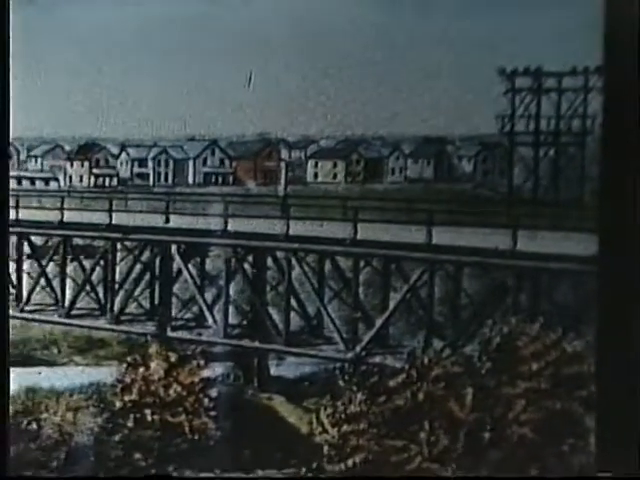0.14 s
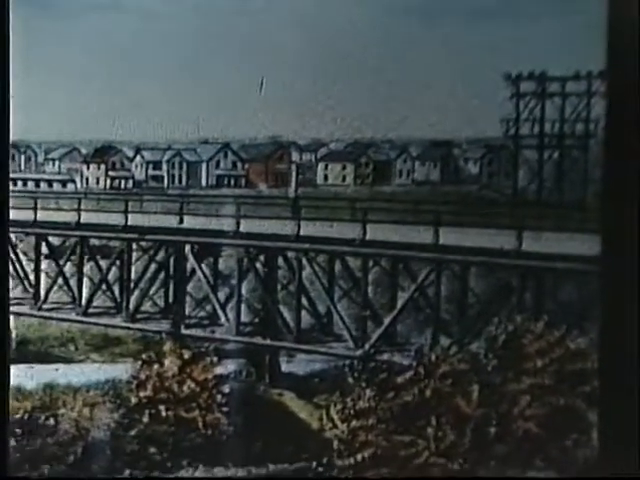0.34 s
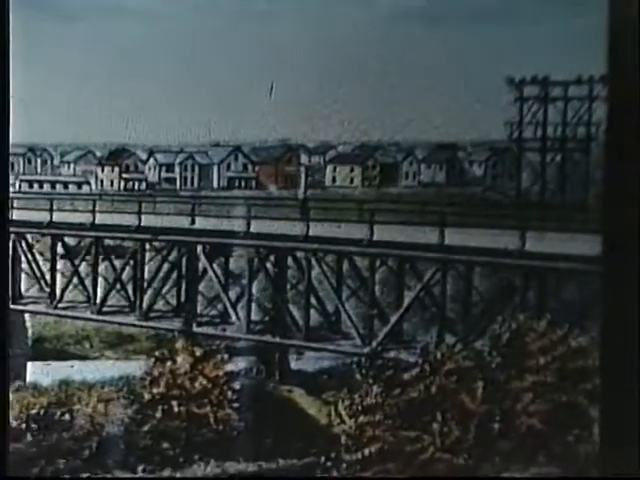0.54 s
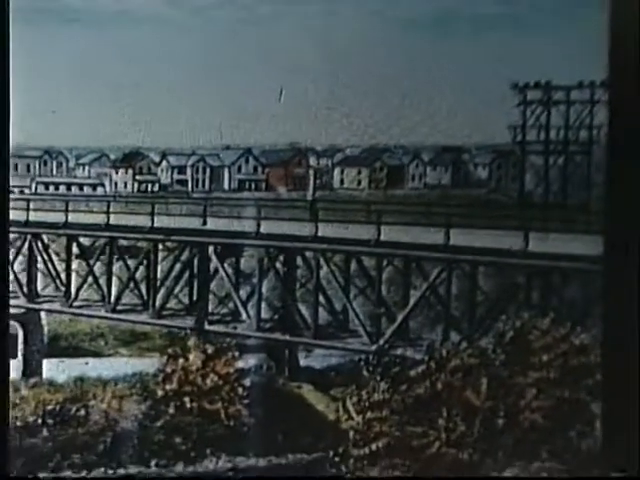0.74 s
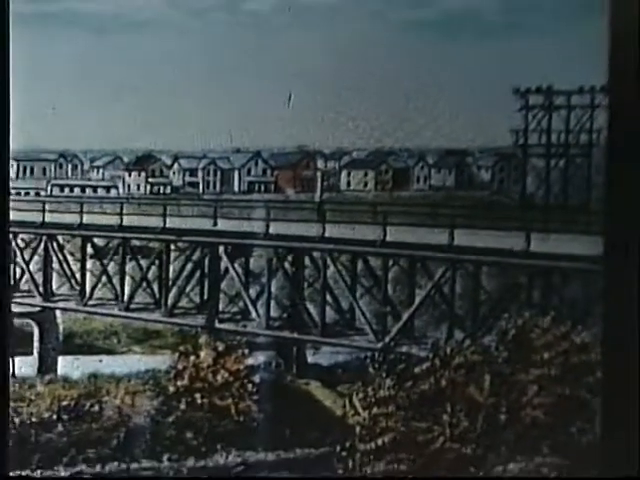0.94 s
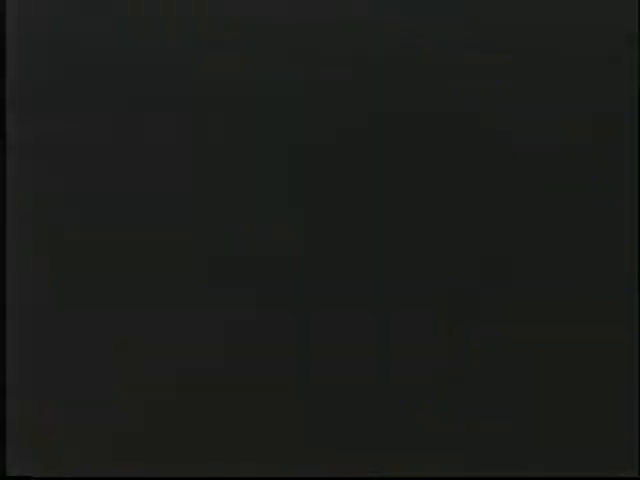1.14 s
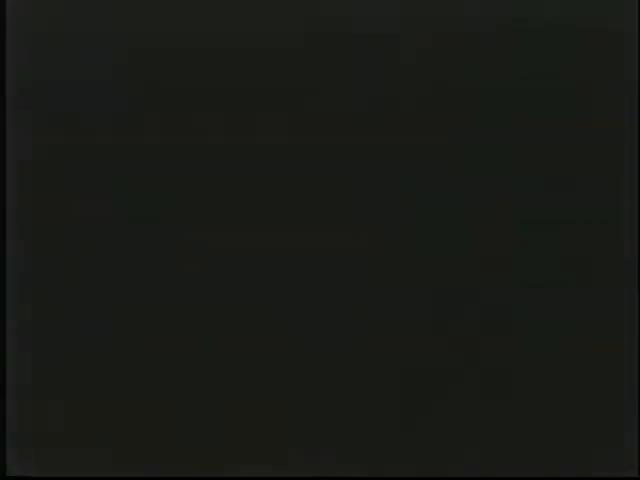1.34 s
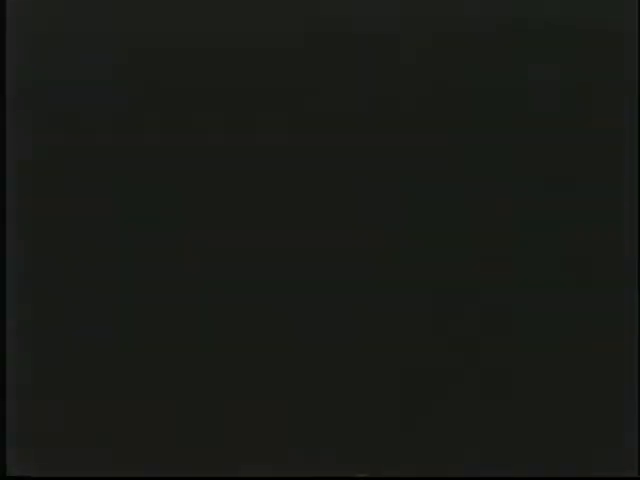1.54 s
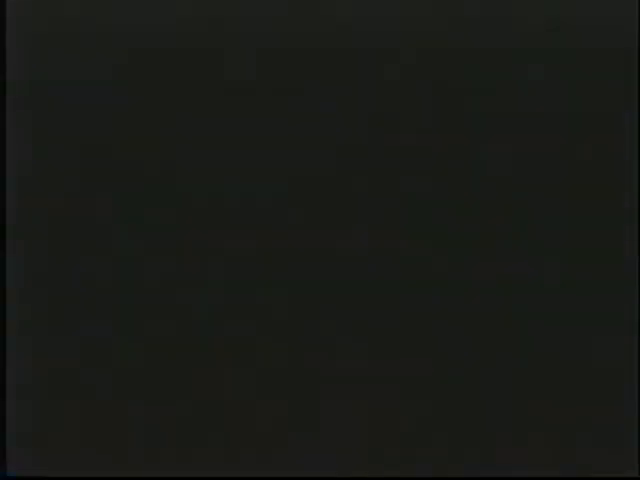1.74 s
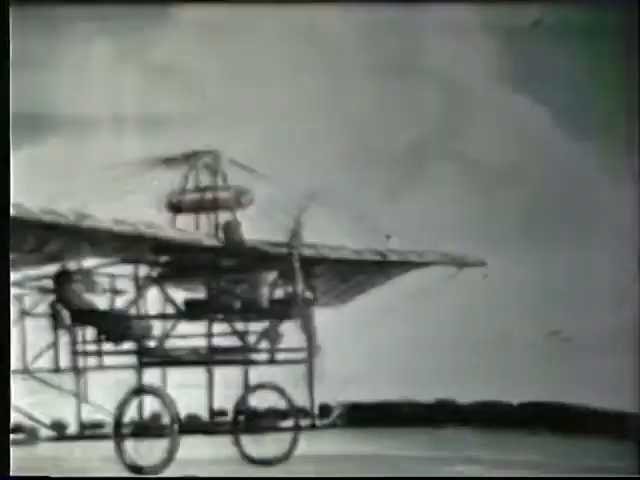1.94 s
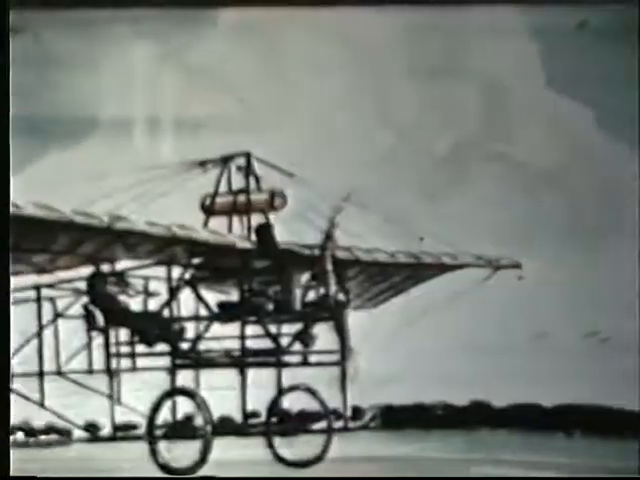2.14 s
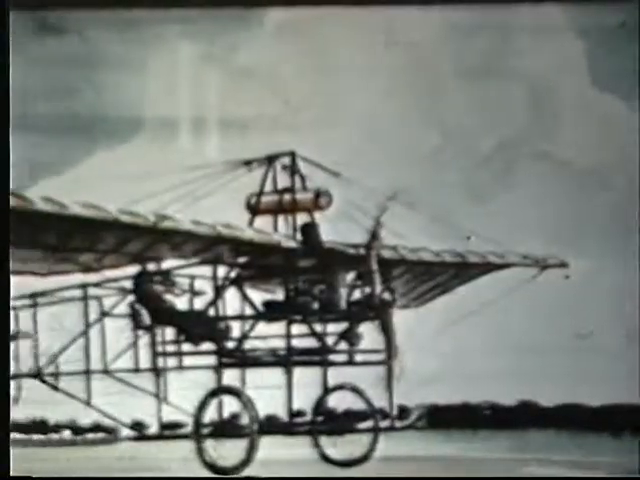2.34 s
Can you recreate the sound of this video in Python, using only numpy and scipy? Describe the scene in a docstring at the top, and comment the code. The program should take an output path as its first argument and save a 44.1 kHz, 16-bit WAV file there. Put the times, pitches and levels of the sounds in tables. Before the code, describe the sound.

A slide projector changes slides with scrape, groan and one sharp clack over fan hum and hiss

```python
"""A slide projector changes slides a few metres away in a small room, over its fan, mains hum and tape hiss.
The arm scrapes the old slide out (random slips) while the housing groans (a noise-blurred gliding tone),
the tray steps on with one clack (noise bursts by octave over ringing modes), the next slide rattles in
amid linkage ticks and seats with a soft knock (resonant noise). The fan is coloured noise under sines."""
import sys
import numpy as np
from scipy import signal
from scipy.fft import rfft, irfft, next_fast_len
from scipy.io import wavfile
from scipy.ndimage import uniform_filter1d

SR = 44100
rng = np.random.default_rng(int(sys.argv[2]) if len(sys.argv) > 2 else 0)


def persist_wave(psi):
    """Save psi, clipped to +-1, as 16-bit WAV."""
    counts = np.round(np.clip(psi, -1, 1) * 32767).astype(np.int16)
    wavfile.write(sys.argv[1], SR, np.atleast_2d(counts).T)


N = 110161
T = np.arange(N) / SR


def undb(db):
    """Decibels to gain."""
    return 10 ** (np.asarray(db) / 20)


def unit(x):
    """Scale to rms 1."""
    return x / np.sqrt(np.mean(x ** 2) + 1e-30)


def noise():
    """White noise."""
    return rng.standard_normal(N)


def on_log(hz, points):
    """Read (f/Hz, value) points on a log-frequency axis."""
    f, value = np.array(points, float).T
    return np.interp(np.log(np.maximum(hz, 1)), np.log(f), value)


def shaped(x, gain):
    """Filter by a gain that is a function of frequency; rms 1."""
    size = next_fast_len(N, True)
    hz = np.arange(size // 2 + 1) * SR / size + 1e-3
    return unit(irfft(rfft(x, size) * gain(hz), size)[:N])


def coloured(x, points, tilt_db=0):
    """Give a sound a spectrum, tilted in dB per octave; rms 1."""
    def gain(f):
        tilt = tilt_db * np.log2(np.maximum(f, points[0][0]))
        return undb(on_log(f, points) + tilt)
    return shaped(x, gain)


def resonant(x, peaks):
    """Pass a sound through steep-sided resonances (f/Hz, width/Hz, level/dB); rms 1."""
    def gain(f):
        total = 0
        for hz, width, db in peaks:
            detuning = (f * f - hz * hz) / (f * width)
            total = total + undb(db) / (1 + detuning ** 2 * 2)
        return total
    return shaped(x, gain)


def wobbling(hz, width, rough):
    """A resonance that speaks as a tone blurred by noise of the given bandwidth; rms 1."""
    def blur():
        return shaped(noise(), lambda f: 1 / (1 + (2 * f / width) ** 4))
    phase = 2 * np.pi * (np.cumsum(hz * np.ones(N)) / SR + rng.random())
    return unit((1 + rough * blur()) * np.sin(phase) + rough * blur() * np.cos(phase))


def fall(age, t60):
    """Exponential fall by 60 dB in t60 seconds."""
    return np.exp(-np.log(1000) * age / max(t60, 1e-3))


def strike(start, rise, t60):
    """Envelope of a blow: quick rise, exponential fall."""
    age = np.maximum(T - start, 0)
    return (1 - np.exp(-age / max(rise, 1e-4))) * fall(age, t60)


def ring(start, rise, modes):
    """Modes (f/Hz, level/dB, t60/s) set ringing by one blow, for half a second at most."""
    out, first = np.zeros(N), int(start * SR)
    age = T[:min(SR // 2, N - first)]
    tone, power = np.zeros(len(age)), 0
    for hz, db, t60 in modes:
        tone += undb(db) * np.sin(2 * np.pi * (hz * age + rng.random())) * fall(age, t60)
        power += undb(db) ** 2 / 2
    out[first:first + len(age)] = tone * (1 - np.exp(-age / max(rise, 1e-4)))
    return out / np.sqrt(power)


def walk(rate):
    """Smooth random drift of rms 1, with `rate` new values per second."""
    k = int(SR / rate)
    steps = np.repeat(rng.standard_normal(N // k + 1), k)
    return unit(uniform_filter1d(uniform_filter1d(steps, k), k)[:N])


def follow(curve):
    """Gain along a (t/s, level/dB) curve, silent outside it."""
    s, db = np.array(curve, float).T
    return undb(np.interp(T, s, db, left=-np.inf, right=-np.inf))


# spectrum of the tape hiss: f/Hz, relative level/dB per Hz
HISS_SPECTRUM = [(100, -1.5), (3000, 3.5), (7000, 1.5), (11000, 0.5), (11600, -10), (13000, -40)]
HISS_DB, TOP_HZ, DC_OFFSET = -81.5, 12800, .0293


def record(dry):
    """Tape adds hiss and cuts the top; the converter sits slightly off zero."""
    taped = dry + undb(HISS_DB) * coloured(noise(), HISS_SPECTRUM)
    # steep low-pass: 0.2 dB ripple, 70 dB down above the cut
    top_cut = signal.ellip(8, .2, 70, TOP_HZ, fs=SR, output="sos")
    return signal.sosfilt(top_cut, taped) + DC_OFFSET


# slow swell of the fan's rush: t/s, level/dB
FAN_SWELL = [(0, -69), (.15, -71.5), (.4, -73), (.9, -73.5), (.98, -71), (1.1, -72), (2.25, -73),
             (2.5, -70)]
# spectrum of the moving air: f/Hz, relative level/dB per Hz
FAN_SPECTRUM = [(40, -5.5), (90, -6), (135, -49), (180, -4), (240, -7.5), (330, 2), (490, -0.5), (560, -5),
                (700, -0.5), (950, -2.5), (1250, -11), (2000, -11), (2900, -17), (3800, -17), (6000, -24.5),
                (12000, -34)]
FLUTTER_DB = .5


def fan():
    """Rush of cooling air: coloured noise with a slow swell and a slight flutter."""
    swell_db = np.interp(T, *np.array(FAN_SWELL).T)
    return undb(swell_db + FLUTTER_DB * walk(12.5)) * coloured(noise(), FAN_SPECTRUM)


# steady tones of mains, fan motor and electronics: f/Hz, level/dB rms
STEADY_TONES = [(59.5, -80), (180, -94.5), (328.4, -84.5), (479.1, -85), (678.3, -82), (780.6, -91),
                (888.2, -87), (1459, -90.5), (1981, -94.5), (8000, -102)]
TONE_WAVER = .3  # phase drift, radians rms


def hum():
    """Mains, motor and electronics: sines whose phase wavers a little."""
    out = np.zeros(N)
    for hz, db in STEADY_TONES:
        phase = 2 * np.pi * (hz * T + rng.random()) + TONE_WAVER * walk(10)
        out += undb(db) * np.sqrt(2) * np.sin(phase)
    return out


# faint dry clicks: t/s, level/dB, f/Hz
DRY_CLICKS = [(.067, -60, 2500), (0.959, -64, 1950)]
CLICK_WIDTH_HZ, CLICK_T60_S = 300, 0.027
CLICK_BODY = (790, 1300, -5)  # broad resonance under each click: f/Hz, width/Hz, level/dB


def clicks():
    """Faint dry clicks: very short bursts of noise through a narrow and a broad resonance."""
    out = np.zeros(N)
    for start, db, hz in DRY_CLICKS:
        burst = resonant(noise(), [(hz, CLICK_WIDTH_HZ, 0), CLICK_BODY])
        out += undb(db) * burst * strike(start, .0005, CLICK_T60_S)
    return out


# housing rumble while the drive runs: t/s, level/dB
RUMBLE_LEVEL = [(.9, -90), (1.0, -77.5), (1.15, -76.5), (1.3, -65), (1.43, -60.5), (1.67, -71), (1.88, -69),
                (2.0, -77), (2.25, -87)]
# resonances of the housing: f/Hz, width/Hz, relative level/dB
HOUSING_RESONANCES = [(186, 44, -2), (252.6, 55, 1), (356, 86, 1), (476, 26, 3), (658, 140, -4.5),
                      (918, 330, -9.5)]
# load on the drive, heard as a groan: t/s, level/dB, f/Hz
GROAN_GLIDE = [(1.119, -84, 341.4), (1.2, -77, 349.6), (1.235, -61.5, 357.5), (1.299, -67, 400),
               (1.337, -62.5, 433.5), (1.385, -54, 445.7), (1.415, -59.5, 430.6), (1.45, -78, 409),
               (1.52, -66, 409)]
GROAN_WIDTH_HZ, GROAN_ROUGH = 127, 0.71


def drive():
    """The drive rumbles in the housing; under load its groan rises in pitch, then eases back."""
    s, _, hz = np.array(GROAN_GLIDE, float).T
    groan = wobbling(np.interp(T, s, hz), GROAN_WIDTH_HZ, GROAN_ROUGH)
    rumble = resonant(noise(), HOUSING_RESONANCES)
    return groan * follow([row[:2] for row in GROAN_GLIDE]) + rumble * follow(RUMBLE_LEVEL)


# bumps of the housing, mostly low: t/s, level/dB, f/Hz
HOUSING_BUMPS = [(1.19, -59, 140), (1.227, -53, 155), (1.258, -57.5, 735), (1.322, -58.5, 160),
                 (1.42, -59.5, 150), (1.523, -49, 150), (1.58, -77, 140), (1.775, -64.5, 135),
                 (1.868, -62.5, 165), (1.895, -62.5, 320), (2.006, -67.5, 125), (2.119, -66.5, 200)]
BUMP_WIDTH_HZ, BUMP_ROUGH, BUMP_RISE_S, BUMP_T60_S = 70, 0.71, .012, 0.21


def bumps():
    """The housing is bumped: blurred tones that rise softly and die away."""
    out = np.zeros(N)
    for start, db, hz in HOUSING_BUMPS:
        thud = wobbling(hz, BUMP_WIDTH_HZ, BUMP_ROUGH)
        out += undb(db) * thud * strike(start, BUMP_RISE_S, BUMP_T60_S)
    return out


# soft knocks of the slide seating: t/s, level/dB
SEAT_KNOCKS = [(2.078, -53), (2.106, -65), (2.128, -65)]
# resonances of the seat: f/Hz, width/Hz, relative level/dB
SEAT_RESONANCES = [(238, 80, -5.5), (364, 120, 1.5), (467, 100, -1.5), (650, 110, -5.5), (787, 89, 1),
                   (943, 83, -5.5)]
KNOCK_RISE_S, KNOCK_T60_S = 0.0026, 0.26


def knocks():
    """The slide seats softly: noise through the seat's resonances."""
    out = np.zeros(N)
    for start, db in SEAT_KNOCKS:
        out += undb(db) * resonant(noise(), SEAT_RESONANCES) * strike(start, KNOCK_RISE_S, KNOCK_T60_S)
    return out


# metal ticks of the linkage: t/s, level/dB, t60/s, spring level/dB relative to the tick
LINKAGE_TICKS = [(1.243, -65.5, 0.19, -11), (1.316, -64, 0.21, -8), (1.348, -62, 0.37, -16),
                 (1.481, -71.5, 0.29, -5), (1.729, -67, 0.18, -4.5), (1.744, -65, 0.21, -12),
                 (1.778, -71, 0.28, -2), (1.826, -73, 0.2, -14), (1.857, -72, .15, -12),
                 (2.001, -68.5, 0.2, 2)]
# spectrum of a tick: f/Hz, relative level/dB per Hz
TICK_SPECTRUM = [(200, 1), (900, -17), (1900, 7), (3000, 2.5), (4500, 1.5), (7000, -3), (10000, -5.5),
                 (12500, -30)]
# modes of the spring: f/Hz, relative level/dB, t60/s
SPRING_MODES = [(2120, -6, 0.26), (3960, -8, 0.13), (5930, 2.5, 0.12), (6040, -3, 0.13), (6870, -13, 0.19),
                (10300, -5.5, 0.061)]
TICK_RISE_S = 0.0016


def linkage():
    """Light metal ticks of coloured noise, each with a spring ringing along."""
    out = np.zeros(N)
    for start, db, t60, spring_db in LINKAGE_TICKS:
        tick = coloured(noise(), TICK_SPECTRUM) * strike(start, TICK_RISE_S, t60)
        spring = undb(spring_db) * ring(start, TICK_RISE_S, SPRING_MODES)
        out += undb(db) * (tick + spring)
    return out


# scrape along the arm's travel: t/s, level/dB
SCRAPE_LEVEL = [(.92, -93), (1.08, -74), (1.17, -68.5), (1.21, -72), (1.255, -67), (1.30, -69.5),
                (1.39, -62), (1.45, -66), (1.50, -65.5), (1.67, -73), (1.715, -70), (1.76, -65),
                (1.815, -69.5), (1.865, -67), (1.97, -78.5), (2.025, -65), (2.075, -69.5), (2.13, -78)]
# spectrum of the scrape: f/Hz, relative level/dB per Hz
SCRAPE_SPECTRUM = [(150, -0.5), (500, 2), (850, 3.5), (1150, -2), (1850, 1), (3000, -8), (4000, -5),
                   (6500, -19.5), (10000, -27), (13000, -49)]
GRAINS_PER_S, GRAIN_SPREAD_DB, GRAIN_T60_S = 700, 3.5, 0.064


def arm():
    """The slide mount catches and slips in its guide: random grains smeared by the room."""
    grain_db = GRAIN_SPREAD_DB * np.minimum(rng.exponential(size=N), 4)
    slips = (rng.random(N) < GRAINS_PER_S / SR) * np.sign(noise()) * undb(grain_db)
    smear = (noise() * strike(0, 0.0014, GRAIN_T60_S))[:SR // 4]
    grains = signal.fftconvolve(slips, smear)[:N]
    return coloured(grains, SCRAPE_SPECTRUM) * follow(SCRAPE_LEVEL)


# blows of the tray step: t/s, level/dB, brightness/dB per octave
TRAY_BLOWS = [(1.511, -47, 1.5), (1.5152, -43.5, 1), (1.523, -45, 0), (1.533, -44.5, -3.5)]
# spectrum of a blow before its brightness tilt: f/Hz, relative level/dB per Hz
CLACK_SPECTRUM = [(100, -18), (300, -15), (430, -5), (570, -12.5), (780, -2), (1200, -1.5), (2000, 1),
                  (2500, -7.5), (3500, -4), (5200, -8), (7000, -13), (10000, -22.5), (13000, -24)]
# modes of the tray: f/Hz, relative level/dB, t60/s
TRAY_MODES = [(813, -7, 0.25), (930, -7, 0.2), (1044.5, -3, 0.21), (1387, -3, .28), (1560, 6, 0.12),
              (1704, 4, 0.11), (1975, 4, 0.12), (2086, 3, 0.15), (2325, -9, 0.076), (2980, -14, 0.13),
              (3290, -7, 0.097), (3486, -9, .16), (4863, 6, 0.1), (5160, -12, 0.11)]
# build-up of a blow; the bass arrives last, by way of the room: f/Hz, rise/s
BLOW_RISE = [(150, 0.011), (800, 0.0061), (2000, 0.0019), (5000, 0.0014), (12000, 0.0021)]
# ring time of housing and room: f/Hz, t60/s
BLOW_DECAY = [(150, 0.28), (500, 0.33), (1000, 0.25), (2000, 0.22), (4000, 0.18), (7000, 0.18),
              (12000, 0.077)]
TRAY_RING_S, TRAY_DB, TRAY_RISE_S = 1.518, -43.5, 0.0053
RATTLE_DB, RATTLE_PER_S = 1, 300


def tray_step():
    """Pawl and tray collide and rattle; the treble comes and dies first, the tray's modes ring on."""
    out = undb(TRAY_DB) * ring(TRAY_RING_S, TRAY_RISE_S, TRAY_MODES)
    octaves = np.arange(np.log2(125), np.log2(16001))
    for start, db, bright_db in TRAY_BLOWS:
        rattle = noise() * undb(RATTLE_DB * walk(RATTLE_PER_S))
        crack = coloured(rattle, CLACK_SPECTRUM, bright_db)
        first, spectrum = int(start * SR), rfft(crack[:SR // 2])
        # half a second of sound gives bins 2 Hz apart
        pitch = np.clip(np.log2(np.arange(len(spectrum)) * 2 + 1), octaves[0], octaves[-1])
        for octave in octaves:
            # overlapping triangular octave bands, each with its own rise and fall
            band = irfft(spectrum * np.maximum(1 - abs(pitch - octave), 0))
            hz = 2 ** octave
            envelope = strike(0, on_log(hz, BLOW_RISE), on_log(hz, BLOW_DECAY))
            out[first:first + len(band)] += undb(db) * band * envelope[:len(band)]
    return out


def scene():
    """The projector as one microphone hears it."""
    background = fan() + hum() + clicks()
    mechanism = drive() + bumps() + knocks() + linkage() + arm() + tray_step()
    return (background + mechanism)[None]


dry = scene()
out = record(dry)
persist_wave(out)
```